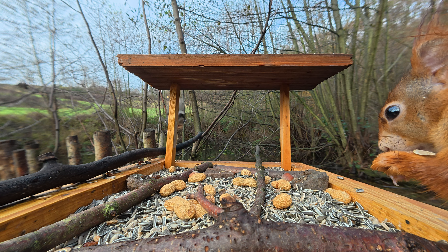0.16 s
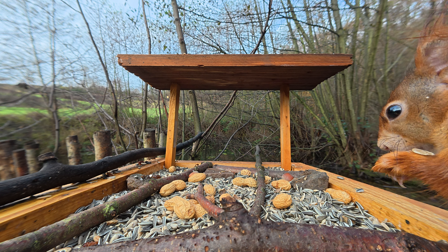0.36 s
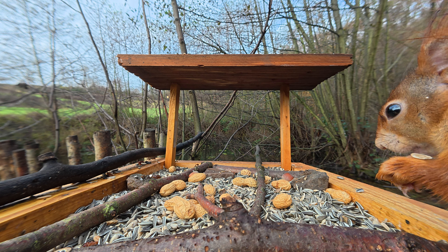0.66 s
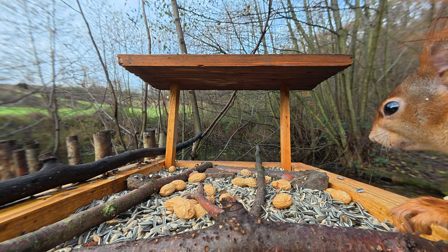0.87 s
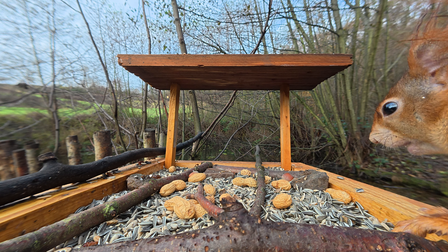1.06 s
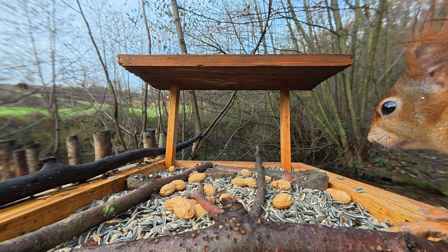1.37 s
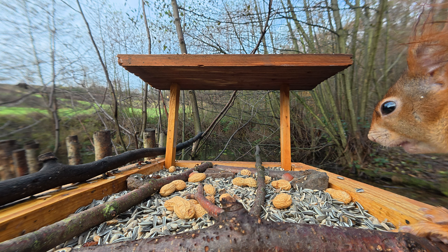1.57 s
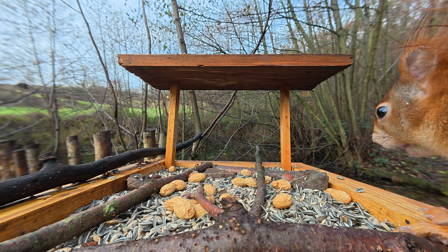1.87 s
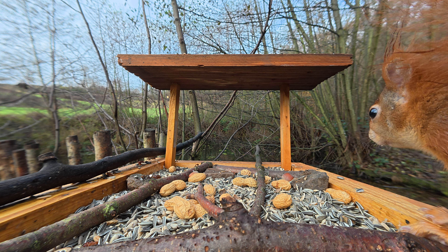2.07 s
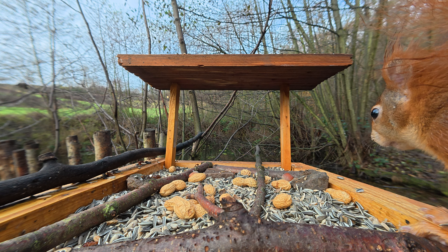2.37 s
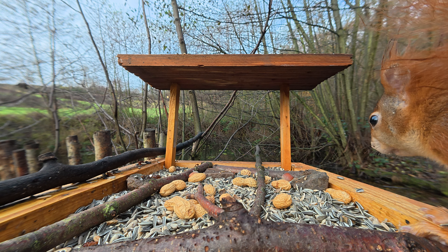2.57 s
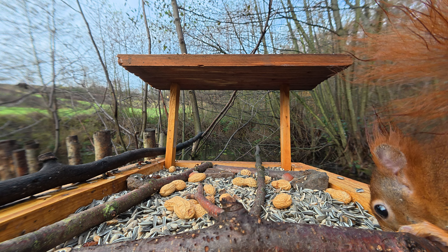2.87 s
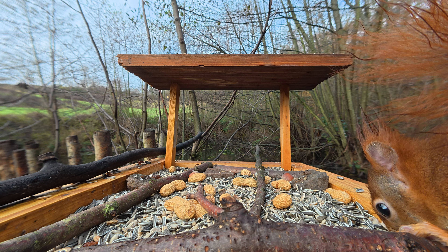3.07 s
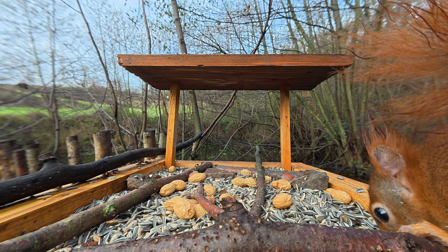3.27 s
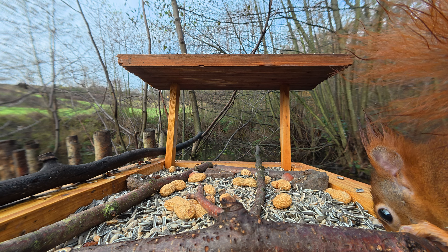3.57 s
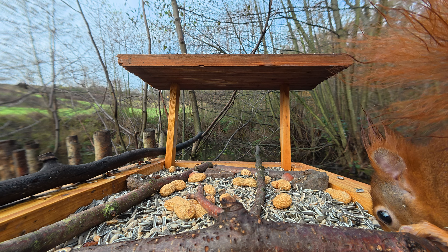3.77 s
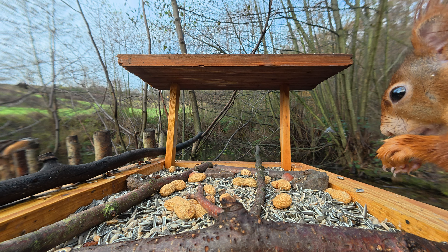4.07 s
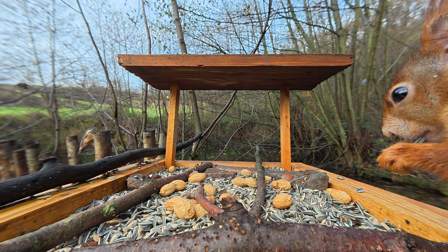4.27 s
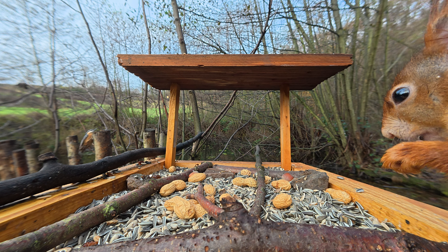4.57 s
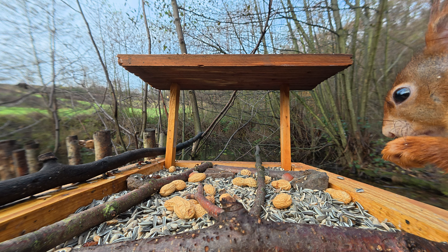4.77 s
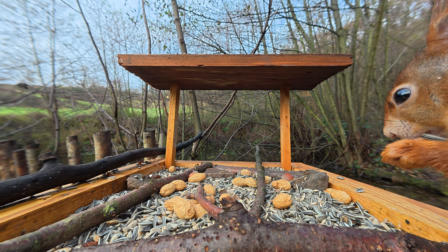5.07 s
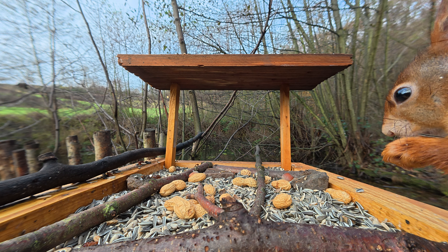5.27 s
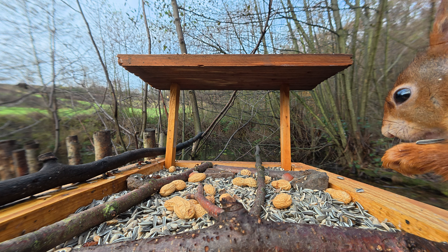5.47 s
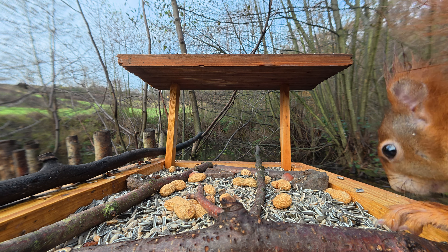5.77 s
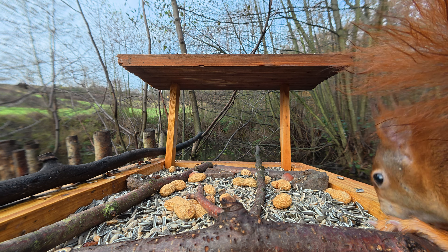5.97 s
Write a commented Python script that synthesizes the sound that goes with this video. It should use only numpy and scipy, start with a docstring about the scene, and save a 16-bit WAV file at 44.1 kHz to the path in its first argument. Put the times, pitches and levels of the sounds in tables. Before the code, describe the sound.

Quiet woodland with a faint low engine drone and airy hush. In the foreground, brittle husk cracks, tiny nibbles and dry seed ticks, with woody taps and claw clicks from a squirrel on a feeder. Birds answer from farther back: quick high chips, falling whistles, lower arched whistles and one brief rasp. The sharpest crack comes about five seconds in, splintering quickly, followed by whistles and a last rustle of paws.

```python
"""Squirrel at a bird table

A squirrel feeds close by on a wooden bird table in a wood. Husks snap and ring between its teeth,
its paws set the boards ringing, and loose seeds tick. Birds whistle, chip and rasp as gliding sine
tones with woodland echoes. Shaped noise makes the hush and the rustles; two far engines hum and throb."""
import sys
import numpy as np
from scipy import signal
from scipy.fft import rfft, irfft
from scipy.io import wavfile
from scipy.ndimage import uniform_filter1d, map_coordinates

SR = 44100
rng = np.random.default_rng(int(sys.argv[2]) if len(sys.argv) > 2 else 0)


def to_wav(sig):
    """Store sig (one row per channel, or 1-D mono) as 16-bit WAV at the path in sys.argv[1].

    Samples outside -1..1 are clipped; the rate is SR.
    """
    pcm = np.clip(np.atleast_2d(sig), -1, 1) * 32767
    pcm = np.round(pcm).astype(np.int16)
    wavfile.write(sys.argv[1], SR, pcm.T)  # frames by channels


N = 270333
TIME = np.arange(N) / SR


def from_db(db):
    """Turn decibels into a gain."""
    return 10 ** (np.asarray(db) / 20)


def rms_one(x):
    """Scale to rms 1."""
    return x / np.sqrt(np.mean(x ** 2) + 1e-20)


def peak_one(x):
    """Scale to peak 1."""
    return x / (np.abs(x).max() + 1e-20)


def in_time(rows):
    """Draw each column of a table as a curve with a value at every sample."""
    s, *columns = np.transpose(rows)
    return [np.interp(TIME, s, column) for column in columns]


def add(out, s, x):
    """Mix a short sound in at time s."""
    room = out[max(0, int(s * SR)):][:len(x)]
    room += x[:len(room)]


def band(x, low_hz, high_hz):
    """Keep only the sound between two frequencies."""
    high_hz = min(max(high_hz, low_hz * 1.1), SR * .48)
    return signal.sosfilt(signal.butter(2, [low_hz, high_hz], "band", fs=SR, output="sos"), x)


def resonate(x, peaks):
    """Let x excite several resonances side by side, with alternating signs."""
    out = 0
    for k, (hz, width, db) in enumerate(peaks):
        r = np.exp(-np.pi * width / SR)
        poles = [1, -2 * r * np.cos(2 * np.pi * hz / SR), r * r]
        ringing = signal.lfilter([1, 0, -1], poles, x + 1e-18)
        out = out + (-1) ** k * from_db(db) * (1 - r * r) / 2 * ringing
    return out


def drift(rate, size=N):
    """A smooth random curve around zero, with `rate` random points per second."""
    steps = np.arange(size) * rate / SR
    return map_coordinates(rng.standard_normal(4096), [steps], order=2, mode="wrap")


# colour of the hush: (frequency [Hz], relative level per Hz [dB])
AIR_COLOUR = [(12, -54), (20, 11), (74, -0.5), (172, -5), (241, -9.5), (499, -17), (802, -24), (1030, -24),
              (1480, -27.5), (1910, -26), (2320, -28.5), (4420, -29), (6010, -32), (14300, -46),
              (16000, -52)]
# how alike the hush is at left and right: (frequency [Hz], likeness [0-1])
AIR_LIKENESS = [(25, .83), (70, .95), (1000, .93), (6000, .93), (9000, .8), (14000, .5)]
# average level of the hush: (time [s], depths [dB], bass [dB], middle [dB])
AIR_LEVEL = [(0.0, -52.5, -50.5, -56.5), (0.39, -45, -50, -59), (0.54, -46, -49.5, -58.5),
             (2.61, -50.5, -51.5, -58), (2.97, -45.5, -51.5, -57.5), (3.69, -47, -49.5, -57.5),
             (4.15, -42.5, -52.5, -57.5), (4.5, -51, -50, -59), (5.05, -49, -47.5, -59),
             (5.51, -48.5, -50.5, -58.5), (6.13, -41, -47.5, -58.5)]


def air(deep_hz=65, split_hz=600, waver_db=1.5):
    """Far traffic and moving twigs merge into a hush; its depths, bass and middle waver separately."""
    hz = np.maximum(np.arange(N // 2 + 1) * SR / N, 1)
    colour_hz, colour_db = np.transpose(AIR_COLOUR)
    alike_hz, likeness = np.transpose(AIR_LIKENESS)
    colour = np.interp(np.log(hz), np.log(colour_hz), colour_db)
    alike = np.clip(np.interp(np.log(hz), np.log(alike_hz), likeness), 0, 1)
    mid, side = rfft(rng.standard_normal((2, N))) * from_db(colour) * hz / np.hypot(hz, 12)
    # the less alike the two sides, the wider the hush
    both = mid + np.sqrt((1 - alike) / (1 + alike)) * side * [[1], [-1]]
    deep = 1 / (1 + (hz / deep_hz) ** 4)
    low = 1 / (1 + (hz / split_hz) ** 2)
    # (share of the spectrum, lowest and highest Hz that set its level, share of the waver)
    parts = [(deep, 20, 65, 1), (low * (1 - deep), 130, 500, 1), (1 - low, 800, 3500, .4)]
    out = 0
    for db, (share, low_hz, high_hz, unrest) in zip(in_time(AIR_LEVEL), parts):
        rms = np.std(irfft(mid * (hz > low_hz) * (hz < high_hz), N))
        gain = from_db(db + unrest * waver_db * drift(11)) / rms
        out = out + gain * irfft(both * share, N)
    return out


# a far engine's slowly rising hum: (time [s], pitch [Hz], average level [dB])
HUM = [(0, 48.24, -52), (0.8, 50.66, -47.5), (1.7, 51.42, -50), (2.9, 53.18, -50.5), (3.5, 55.2, -56),
       (4.3, 57, -56), (4.8, 57, -59), (6.13, 60.3, -64)]
# a second engine, stronger in the later part: (time [s], cycle rate [1/s], level [dB])
ENGINE = [(0, 10.4, -56.5), (3.2, 8.3, -59), (3.9, 9.1, -48), (4.4, 10.26, -47.5), (5.2, 9.7, -45.5),
          (5.6, 10.3, -47), (6.13, 9.6, -50)]
# its partial tones: (multiple of the cycle rate, average relative level [dB])
ENGINE_PARTIALS = [(9, -9.5), (10, 2.5), (11, -14), (12, -5.5), (14, -16)]


def drones(hum_waver_db=-1.5, throb_db=3.5, slip_rad=0.4):
    """Two far engines: one hums on a single low tone, the other's close partials beat into a throb."""
    hz, db = in_time(HUM)
    tone = np.sin(2 * np.pi * np.cumsum(hz) / SR)
    hum = from_db(db + hum_waver_db * drift(4.7)) * rms_one(tone)
    rate, db = in_time(ENGINE)
    turn = 2 * np.pi * np.cumsum(rate) / SR
    throb = 0
    for multiple, level_db in ENGINE_PARTIALS:
        gain = from_db(level_db + throb_db * drift(3.12))
        start = rng.uniform(0, 2 * np.pi)
        throb = throb + gain * np.sin(round(multiple) * turn + start + slip_rad * drift(5))
    return hum + from_db(db) * rms_one(throb)


# rummaging among the seeds: (time [s], level before the boost in seeds() [dB])
RUMMAGE = [(0.0, -66.5), (0.38, -65.5), (1.01, -70), (1.6, -68.5), (2.08, -78.5), (3.3, -68.5),
           (4.71, -72.5), (5.04, -69), (5.43, -81), (5.72, -73.5), (5.89, -62.5), (6.13, -68.5)]
# ring of loose seeds: (frequency [Hz], width [Hz], relative level [dB])
SEED_RINGS = [(2530, 1100, 0), (3700, 270, 3.5), (5190, 1000, -2), (7450, 4300, -3), (9480, 170, 2.5),
              (10420, 190, -0.5), (12000, 590, -9.5)]


def seeds(ticks_per_s=800, boost_db=5.5, size_db=4.6, clump_db=7.5):
    """Loose seeds tick against each other in little clumps, each tick waking one resonance."""
    db, = in_time(RUMMAGE)
    # the chance of a tick rises and falls around the given rate
    born = rng.random(N) < ticks_per_s * from_db(clump_db * drift(70)) / SR
    size = from_db(size_db * np.minimum(rng.exponential(1, N), 3))
    ticks = born * size * rng.choice([-1, 1], N)
    dealt = rng.integers(0, len(SEED_RINGS), N)
    ringing = sum(resonate(ticks * (dealt == k), [ring]) for k, ring in enumerate(SEED_RINGS))
    return from_db(db + boost_db) * rms_one(ringing)


LEAD_IN_S = .004  # noise lead-in before each snap


def snap(crumble_s=0.001, lead_in=0.031, scatter=.02, scatter_t60=.045):
    """The force of a break: a faint swell of noise, a snap and a crumble; seeds and roof scatter it."""
    t = np.arange(1500) / SR - LEAD_IN_S
    crumble = from_db(-60 * np.abs(t) / crumble_s)
    after = crumble + scatter * from_db(-60 * np.abs(t) / scatter_t60)
    force = rng.standard_normal(len(t)) * np.where(t < 0, lead_in * (1 + t / LEAD_IN_S), after)
    force[round(LEAD_IN_S * SR)] += 1
    return rms_one(force)


# resonances of a husk, all three tables: (frequency [Hz], width [Hz], relative level [dB])
SHELL_BODY = [(2330, 1000, -5), (4600, 190, 6.5), (5130, 530, 4.5), (6030, 780, 6.5)]
SHELL_EDGE = [(8960, 790, 1.5), (10170, 1380, -3)]
SHELL_UPPER = [(11940, 1100, -2), (15300, 740, -10.5)]


def bite(body_db, upper_db, split_s, splinters=5, loss_db=7.5, edge_low_hz=8140):
    """A snap and a run of ever smaller splinters set the husk ringing."""
    force = np.zeros(SR // 10)
    for k in range(splinters):
        # loss_db is lost with each doubling of the splinter count
        gain = from_db(-loss_db * np.log2(k + 1))
        add(force, split_s * k / (splinters - 1), gain * snap())
    bright = resonate(force, SHELL_EDGE) + from_db(upper_db) * resonate(force, SHELL_UPPER)
    bright = signal.sosfilt(signal.cheby1(5, 1, edge_low_hz, "high", fs=SR, output="sos"), bright)
    sound = bright + from_db(body_db) * resonate(force, SHELL_BODY)
    # bring the loudest 32 samples to rms 1
    return sound / np.sqrt(uniform_filter1d(sound ** 2, size=32).max())


# husk cracks: (time [s], short-term peak before the trim in cracks() [dB],
# shell body [dB], upper ring [dB], splitting time [s])
CRACKS = [(0.061, -46, -20, 3, .004), (.358, -37, -3, -12, .002), (.3602, -37.5, 1, -8, .004),
          (.436, -46.5, -20, -6, .001), (0.4399, -38, -13, -6, .001), (0.4573, -42, -15, -5, 0.0022),
          (.4607, -38, -22, -8, .002), (.4635, -26.5, -28, -7, .002), (0.4654, -30, -19, 0, .002),
          (.546, -47, -22, -10, .002), (0.5517, -31, -27, -5, 0.0026), (.571, -38, -26, -10, .002),
          (0.7221, -40.5, -22, -14, .002), (1.8897, -34, -9.5, -7, 0.0022), (2.3155, -44.5, -20, 3, .003),
          (2.394, -32.5, 14, -14, 0.0012), (2.416, -39.5, -5, -16, 0.0016), (2.625, -45.5, -19.5, 0, .002),
          (2.761, -45, -15, 3, .002), (2.771, -38, 6, 11, 0.0054), (2.783, -44, -4, 5, .003),
          (3.1015, -35, -15, 8.5, 0.0053), (3.198, -42, -7, 1, .012), (3.231, -52, -14, 0, .002),
          (3.331, -45, -11, -9, 0.0018), (3.383, -44.5, -8, -8, .004), (3.483, -43, -18, 5, .004),
          (3.498, -43, -16, 2, .01), (4.072, -46, -20, -2, 0.011), (4.1438, -35, -21, 0, 0.002),
          (4.202, -37.5, -9, -9, 0.0054), (4.327, -28.5, -31, -3, .002), (4.334, -36.5, -10, -9, 0.02),
          (4.645, -46.5, -19.5, -12, .004), (4.6851, -37.5, -18, -10, .002), (4.749, -42, -22, -11, 0.0014),
          (4.9, -13, -9.5, -5.5, 0.0004), (4.911, -23, -5, -7, 0.00053), (4.9168, -33, -9, -7, .001),
          (4.921, -28.5, -15, -4, .001), (4.932, -29, -15, -2, .002), (4.9398, -40, -20, 2, .001),
          (4.946, -35, -13, 2, .002), (5.16, -45, -12, 1, .002), (5.2098, -36, -14, 7, 0.0021),
          (5.4138, -35, -20, -15, .002), (5.867, -37.5, -25, 2, 0.0033)]


def cracks(trim_db=-2.5, nibbles_per_s=5.3, nibble_db=-51, nibble_spread_db=-4):
    """Hard bites crack the husks; light nibbles come at random times throughout."""
    out = np.zeros(N)
    chance = rng.random((int(nibbles_per_s * N / SR), 2))
    nibbles = []
    for k, (when, force) in enumerate(chance):
        db = nibble_db + nibble_spread_db * (2 * force - 1)
        # body -25 dB, upper ring 15 dB, splitting for 0.012 s
        nibbles.append(((k + when) / nibbles_per_s, db, -25, 15, 0.012))
    for s, db, body_db, upper_db, split_s in CRACKS + nibbles:
        add(out, s - LEAD_IN_S, from_db(db + trim_db) * bite(body_db, upper_db, split_s))
    return out


# ringing of the boards: (frequency before detuning [Hz], average relative level [dB],
# longest time to fall 60 dB [s])
BOARDS = [(306, 7, 0.018), (375, -5, 0.07), (456, -2.5, 0.07), (603, -1.5, 0.072), (842, -4, 0.074),
          (882, -8.5, 0.11), (1310, -6.5, 0.18), (1537, -5, 0.11), (1700, -6, 0.07), (2103, -10, 0.15),
          (2802, -11, 0.12), (3380, -1.5, 0.24), (3790, -5.5, 0.076), (4740, -6, 0.056)]


def contact(low_hz, high_hz, dying_s, scuff=3.15, grain_db=4.0):
    """A touch makes the boards ring and rubs across them: soft pads low, claws high."""
    t = np.arange(int((dying_s + .04) * SR)) / SR
    hz, mode_db, t60 = np.transpose(BOARDS)[:, :, None]
    strength = from_db(mode_db + 2 * rng.standard_normal(hz.shape)) * rng.choice([-1, 1], hz.shape)
    # the paw resting on the wood detunes and damps it
    hz = hz * (1 + .012 * rng.standard_normal(hz.shape))
    fade = from_db(-60 * t / np.minimum(t60, dying_s))
    ringing = np.sum(strength * np.sin(2 * np.pi * hz * t) * fade, axis=0)
    grain = from_db(grain_db * drift(342, size=len(t)) - 60 * t / dying_s)
    rubbing = scuff * rng.standard_normal(len(t)) * grain
    return peak_one(band(ringing + band(rubbing, low_hz / 2, high_hz), low_hz, high_hz))


# The peaks in these three tables are before the boost in knocks().
# paws scuff across the boards: (time [s], peak [dB], highest frequency [Hz], dying time [s])
SCUFFS = [(0.1661, -32, 3500, 0.031), (0.2009, -26.5, 3150, 0.058), (0.2108, -30, 2800, 0.09),
          (.258, -38.5, 2230, 0.068), (.269, -39, 1700, 0.13), (.308, -38.5, 1700, 0.095),
          (.319, -36.5, 1600, 0.041), (0.36, -38, 7000, 0.035), (0.452, -43, 2000, 0.76),
          (.521, -41.5, 1490, 0.081), (0.569, -42, 1600, 0.081), (5.882, -42.5, 5000, 0.09),
          (5.9, -44, 3780, 0.24), (5.927, -35.5, 2200, 0.052), (5.971, -37, 1490, 0.02)]
# taps of a pad or claw: (time [s], peak [dB], centre frequency [Hz], dying time [s])
TAPS = [(.147, -42.5, 604, .07), (.166, -35.5, 636, 0.051), (.3045, -36.5, 260, 0.046),
        (.925, -35, 444, 0.038), (2.555, -47, 3800, 0.021), (2.749, -43, 5500, 0.04),
        (3.024, -36.5, 5550, 0.052), (3.29, -46, 3500, .03), (3.311, -36, 3900, 0.0203),
        (3.79, -40.5, 2672, .05), (4.204, -42, 3230, .025), (4.677, -39, 890, 0.054),
        (5.722, -38.5, 151, 0.2), (5.869, -31, 360, 0.1), (5.903, -47, 3580, 0.022),
        (5.916, -39, 3350, 0.015), (6.079, -43.5, 3430, .035)]
# thuds as the squirrel shifts its weight: (time [s], peak [dB])
THUDS = [(0.219, -31), (0.263, -28.5), (0.312, -30), (0.453, -33.5)]


def knocks(boost_db=1.5, tap_width_octaves=0.41, claw_above_hz=800, claw_db=-2,
           jolt_above_db=-30, jolt_db=-18.5):
    """Scuffs, taps and thuds on the table; the hardest cracks of a husk also jolt the boards."""
    out = np.zeros(N)
    edge = 2 ** (tap_width_octaves / 2)
    for s, db, high_hz, dying_s in SCUFFS:
        add(out, s, from_db(db) * contact(387, high_hz, dying_s))
    for s, db, hz, dying_s in TAPS:
        add(out, s, from_db(db) * contact(hz / edge, hz * edge, dying_s))
        # the higher taps come from a claw and start with a crisp click
        if hz > claw_above_hz:
            add(out, s, from_db(db + claw_db) * contact(claw_above_hz, 8000, 0.0065))
    for s, db in THUDS:
        add(out, s, from_db(db) * contact(30.3, 67.5, 0.119))
    for s, db, *_ in CRACKS:
        if db > jolt_above_db:
            add(out, s, from_db(db + jolt_db) * contact(380, 1400, 0.021))
    return from_db(boost_db) * out


# treble of a near sound at the two sides: (frequency [Hz], left minus right [dB], lead of left [rad])
SIDE_DIFFERENCES = [(100, -1, 0.046), (2000, -0.5, 0.18), (6000, 1.5, 0.37), (9000, -4, -0.9),
                    (11000, 1.5, -0.84), (13300, 12.5, -1.7), (15900, -4, -1.5)]


def close_by(x):
    """Give a near sound a level and timing that differ between left and right, mostly in the treble."""
    hz, left_db, lead = np.transpose(SIDE_DIFFERENCES)
    bins = np.arange(N // 2 + 1) * SR / N
    # each side takes half of the difference
    half = from_db(np.interp(bins, hz, left_db) / 2) * np.exp(.5j * np.interp(bins, hz, lead))
    return irfft(rfft(x) * np.array([half, 1 / half]), N)


def woodland(x, trunks_db, tail_db, near_db, trunks_t60=0.19):
    """Echoes of x: one close tree, a spray from nearby trunks, and a tail whose treble air absorbs."""
    t60, air_hz, near_s, side_spread = 1.4, 6000, .023, .16
    t = np.arange(SR) / SR
    hits = (rng.random(SR) < 1500 / SR) * (t > .006)
    # the two rows are what both sides share (mid) and what sets them apart (side)
    trunks = rng.standard_normal((2, SR)) * hits * from_db(-60 * t / trunks_t60)
    tail = rng.standard_normal((2, SR)) * (1 - np.exp(-t / 0.0034))
    dull = signal.sosfiltfilt(signal.butter(4, air_hz, fs=SR, output="sos"), tail)
    tail = dull * from_db(-60 * t / t60) + (tail - dull) * from_db(-60 * t / (0.35 * t60))
    echoes = from_db(trunks_db) * rms_one(trunks) + from_db(tail_db) * rms_one(tail)
    echoes = echoes / np.sqrt(SR)
    echoes[0, int(near_s * SR)] += from_db(near_db)
    mid, side = signal.fftconvolve(x[None], echoes, axes=1)[:, :N]
    return mid + side_spread * side * [[1], [-1]]


def note(length, crest_hz, fall_octaves, shape, waver=0.0017, rough=0.0046, flutter_db=2.0,
         rise_shape=2.66, fall_shape=1.5, octave_db=-65):
    """A near sine rises to a crest, may fall away and ends in a flick, swelling and fading on the way."""
    rise_octaves, crest, loudest, fade_db, flick_octaves = shape
    crest, loudest = np.clip([crest, loudest], .02, .98)
    u = np.linspace(0, 1, int(length * SR))  # place within the note
    rise = np.maximum(1 - u / crest, 0) ** rise_shape
    fall = np.maximum((u - crest) / (1 - crest), 0) ** fall_shape
    hz = crest_hz * 2 ** (-rise_octaves * rise - fall_octaves * fall - flick_octaves * u ** 10)
    # the steeper the fall, the more the pitch shakes
    shake = waver * drift(224, size=len(u))
    shake = shake + rough * fall_octaves / length * drift(947, size=len(u))
    fade = fade_db * np.interp(u, [0, loudest, 1], [1, 0, 1]) ** 2
    loudness = flutter_db * drift(118.0, size=len(u)) - fade
    swell = np.tanh(u / 0.041) * np.tanh((1 - u) / 0.04) * from_db(loudness)
    phase = 2 * np.pi * np.cumsum(hz * (1 + shake)) / SR
    return swell * (np.sin(phase) + from_db(octave_db) * np.sin(2 * phase))


# short contact chips: (time [s], length [s], crest pitch [Hz], rise [octaves], fall [octaves], # level [dB],
# echo relative to the chip [dB]); the row at 1.785 s is a strong echo of the 1.763 s chip # from a close trunk
CHIPS = [(0.615, 0.015, 6496, 0.04, 0.076, -41.5, -7), (0.82, 0.021, 8140, 0.79, 0.14, -46.5, 3),
         (0.97, .016, 6750, .02, 0.13, -44, 0), (1.692, 0.018, 6700, .12, 0.13, -34.5, -6),
         (1.763, 0.019, 6300, 0.017, 0.2, -38, -4), (1.785, 0.02, 6120, 0.032, 0.011, -38, -8),
         (2.144, 0.03, 6250, 0.01, 0.24, -47.5, -0.5), (2.179, 0.038, 5780, 0.048, 0.08, -45.5, -2),
         (2.414, 0.019, 6160, 0.14, 0.086, -37.5, 0), (2.42, 0.012, 7550, .05, 0.15, -48, -2),
         (2.472, 0.021, 6010, 0.26, 0.028, -34, -5.5), (2.818, 0.014, 6480, .05, 0.069, -45.5, 0.5),
         (2.873, 0.027, 6550, 0.077, .08, -41, -5), (3.253, 0.03, 7270, .9, 0.22, -41.5, 2),
         (3.681, 0.028, 7720, 0.424, 0.35, -44.5, 4), (3.875, 0.03, 6950, .7, 0.27, -45, 3),
         (4.222, .034, 5130, .05, 0.37, -49.5, 1), (5.995, 0.02, 7500, .02, 0.064, -50, -3),
         (6.01, 0.026, 6940, .01, 0.031, -43.5, -2.5)]
# shape of a chip: (crest place [0-1], loudest place [0-1], fade at the ends [dB], final flick [octaves])
CHIP_SHAPE = (0.212, 0.466, 4.9, 0.11)
# faint rising chirps: (time [s], length [s], crest pitch [Hz], level [dB])
RISING_CHIRPS = [(1.603, .026, 3950, -56.5), (1.637, .026, 4650, -54), (1.812, .024, 3830, -55)]
# their shape, whose negative flick goes upward: (rise [octaves], crest place [0-1],
# loudest place [0-1], fade at the ends [dB], final flick [octaves])
RISING_SHAPE = (.11, 0.8, .7, 4, -0.04)


def chatter():
    """Nearer birds make quick chips, rising chirps and a rasp; the farther the bird, the more echo."""
    out = rasp()
    for s, length, hz, db in RISING_CHIRPS:
        chirp = note(length, hz, 0, RISING_SHAPE, waver=0.006, rise_shape=1.2)
        add(out, s, from_db(db) * chirp)
    among_trees = out.copy()
    for s, length, hz, rise, fall, db, echo_db in CHIPS:
        chip = from_db(db) * note(length, hz, fall, (rise, *CHIP_SHAPE), waver=0.002, rough=0.00081,
                                  flutter_db=1.1, fall_shape=1.229, octave_db=-38)
        add(out, s, chip)
        add(among_trees, s, from_db(echo_db) * chip)
    return out + woodland(among_trees, trunks_db=-1.0, tail_db=-20.5, near_db=-11, trunks_t60=0.27)


# thin falling whistles: (time [s], length [s], crest pitch [Hz], fall [octaves], level [dB])
HIGH_WHISTLES = [(0.7, 0.029, 7370, 0.0044, -45), (0.739, 0.066, 7310, 0.085, -31.5),
                 (0.881, 0.04, 6930, 0.01, -37), (0.924, 0.068, 6905, 0.047, -37.5),
                 (4.517, 0.11, 6780, 0.15, -49), (4.669, 0.11, 6430, 0.046, -48.5),
                 (4.821, 0.115, 7430, 0.24, -39), (4.969, 0.065, 7140, 0.0054, -44),
                 (5.036, 0.053, 7100, 0.059, -38)]
# their shape: (rise [octaves], crest place [0-1], loudest place [0-1],
# fade at the ends [dB], final flick [octaves])
HIGH_SHAPE = (0.057, 0.172, 0.74, 15, 0.036)


def high_whistles():
    """Songs of high falling whistles, far back among the trees, drawn out by a long echo tail."""
    out = np.zeros(N)
    for s, length, hz, fall, db in HIGH_WHISTLES:
        add(out, s, from_db(db) * note(length, hz, fall, HIGH_SHAPE))
    return out + woodland(out, trunks_db=-11.5, tail_db=-2.0, near_db=-18.0)


# lower, arched whistles: (time [s], length [s], crest pitch [Hz], rise [octaves], fall [octaves], # level [dB],
# strength of the far echoes [dB]); the last row is a faint, flat echo of the 5.199 s whistle
LOW_WHISTLES = [(1.054, 0.05, 4410, 0.0172, .005, -52, -35), (1.089, 0.1, 4440, 0.131, .06, -44, -11),
                (1.293, 0.096, 4346, 0.1384, 0.062, -38.5, -30), (1.353, 0.082, 4980, .12, .003, -51, -60),
                (5.199, 0.0685, 4420, 0.204, 0.019, -42.5, -21), (5.402, 0.11, 4330, 0.19, 0.016, -43, -16),
                (5.548, 0.045, 4469, .02, 0.0026, -51, -26)]
# their shape: (crest place [0-1], loudest place [0-1], fade at the ends [dB], final flick [octaves])
LOW_SHAPE = (0.431, 0.32, 10, 0.018)
# far echoes from the edge of the wood: (delay [s], level added to each whistle's echo strength [dB])
FAR_ECHOES = [(0.126, -4), (.39, 0)]


def low_whistles():
    """Low arched whistles; the wood's edge throws them back, more so when the bird faces it."""
    out = np.zeros(N)
    for s, length, hz, rise, fall, db, echo_db in LOW_WHISTLES:
        call = from_db(db) * note(length, hz, fall, (rise, *LOW_SHAPE), flutter_db=1.5)
        add(out, s, call)
        for delay, far_db in FAR_ECHOES:
            add(out, s + delay, from_db(echo_db + far_db) * call)
    return out + woodland(out, trunks_db=-5.5, tail_db=-8.5, near_db=-9.5, trunks_t60=0.28)


# soft rustles: (time [s], length [s], level before the swell [dB],
# lowest frequency [Hz], highest frequency [Hz])
RUSTLES = [(1.265, 0.17, -63, 2900, 4100), (2.699, 0.69, -59.5, 3220, 4580), (4.297, 0.18, -58, 4000, 6100)]


def rustles(grain_db=1.5):
    """Soft, grainy bands of noise that swell and fade."""
    out = np.zeros(N)
    for s, length, db, low_hz, high_hz in RUSTLES:
        size = int(length * SR)
        grains = rng.standard_normal(size) * from_db(grain_db * drift(151.0, size=size))
        swell = np.sin(np.linspace(0, np.pi, size))
        add(out, s, from_db(db) * swell * rms_one(band(grains, low_hz, high_hz)))
    return out


# a bird's harsh rasp: (time [s], average pitch [Hz], level [dB])
RASP = [(2.22, 2600, -89), (2.25, 2470, -50.5), (2.295, 2160, -55), (2.33, 2020, -83.5), (2.4, 2000, -110)]
# its harmonics, from the first up: (relative level [dB])
RASP_HARMONICS_DB = [-5.5, 3, -8.5, -11]


def rasp(waver=0.053, hiss_db=0.0):
    """A short falling scold: its pitch shakes so fast that the harmonics blur; hiss joins them."""
    hz, db = in_time(RASP)
    phase = 2 * np.pi * np.cumsum(hz * (1 + waver * drift(1500))) / SR
    tone = 0
    for k, level_db in enumerate(RASP_HARMONICS_DB):
        tone = tone + from_db(level_db) * np.sin((k + 1) * phase)
    hiss = from_db(hiss_db) * rms_one(band(rng.standard_normal(N), 3300, 8600))
    return from_db(db) * rms_one(tone + hiss)


def scene(rattle_side_db=-17):
    """The squirrel close by, the birds, the far engines and the hush all round."""
    background = air() + drones()
    # a second, fainter set of knocks, opposite in sign at left and right, widens the first
    paws = knocks() + from_db(rattle_side_db) * knocks() * [[1], [-1]]
    squirrel = close_by(seeds() + cracks() + paws)
    birds = chatter() + high_whistles() + low_whistles()
    return background + squirrel + birds + rustles()


def record(dry):
    """Cut the top steeply above 16200 Hz."""
    return signal.sosfilt(signal.ellip(10, .1, 80, 16200, fs=SR, output="sos"), dry)


dry = scene()
out = record(dry)
to_wav(out)
```